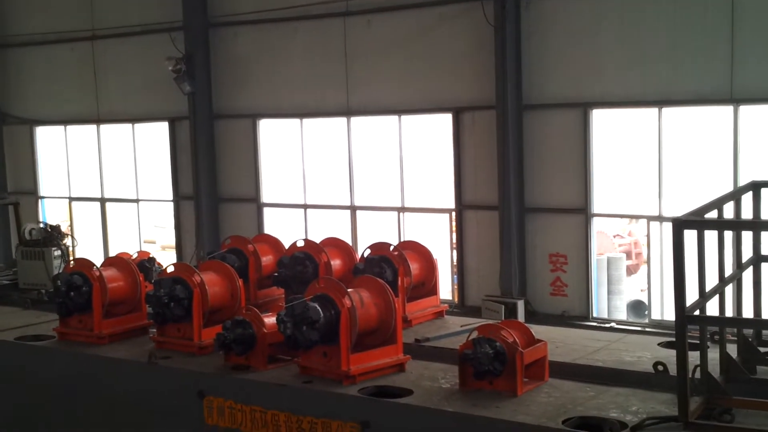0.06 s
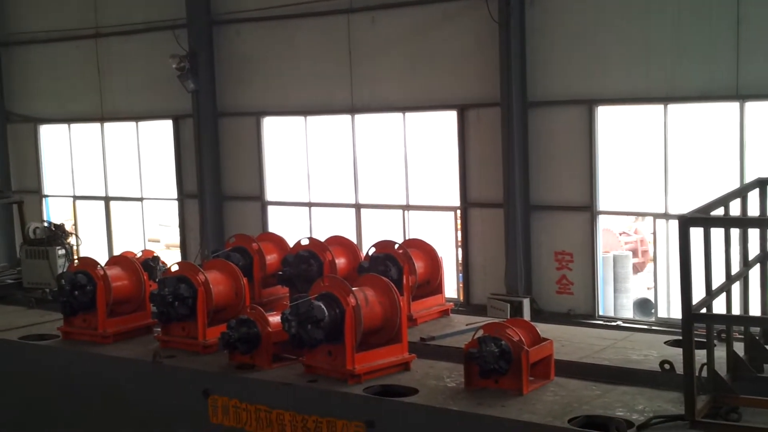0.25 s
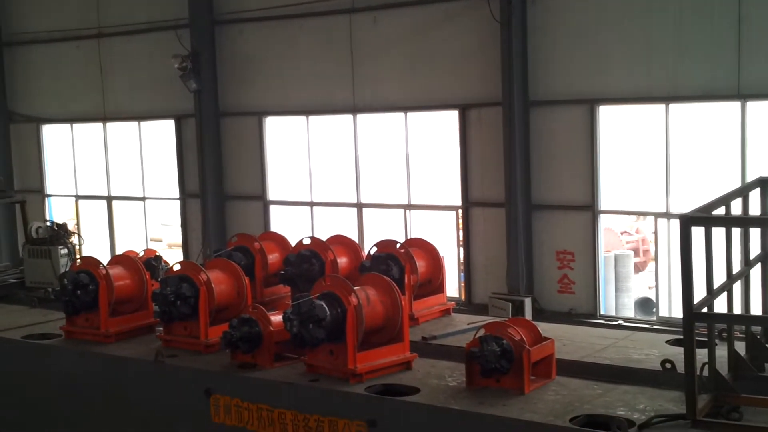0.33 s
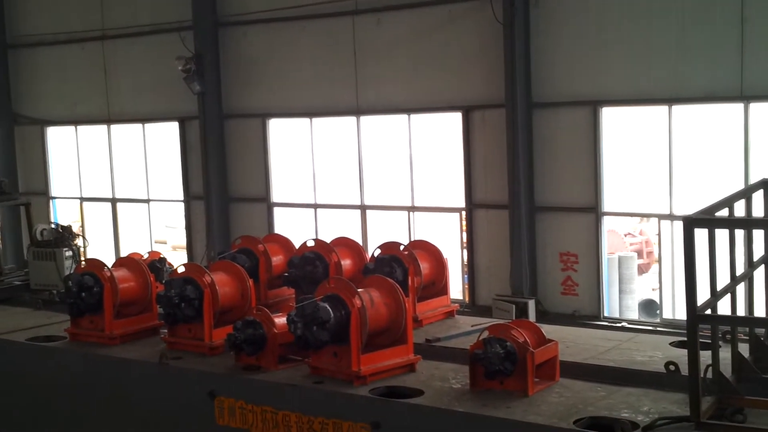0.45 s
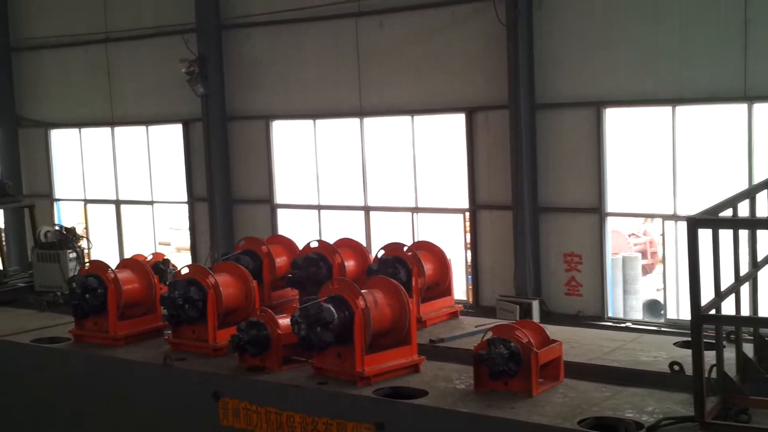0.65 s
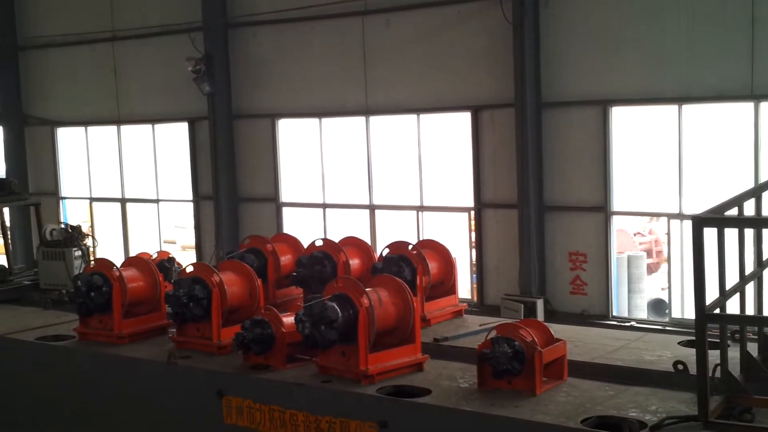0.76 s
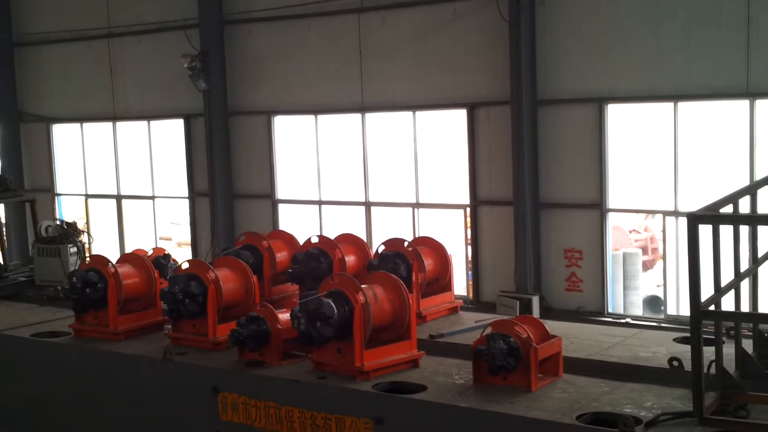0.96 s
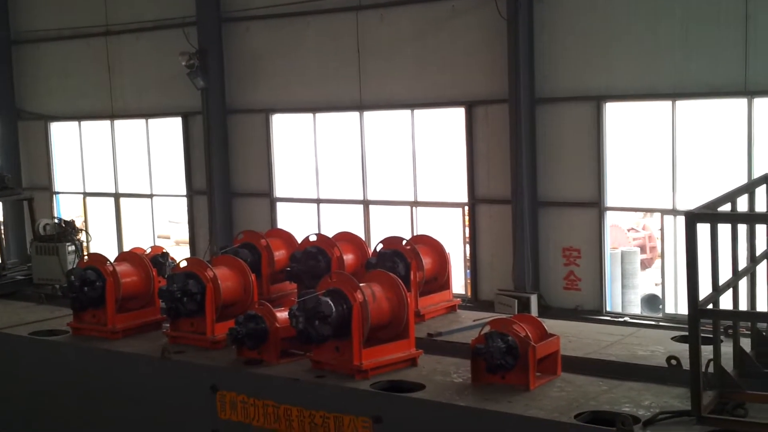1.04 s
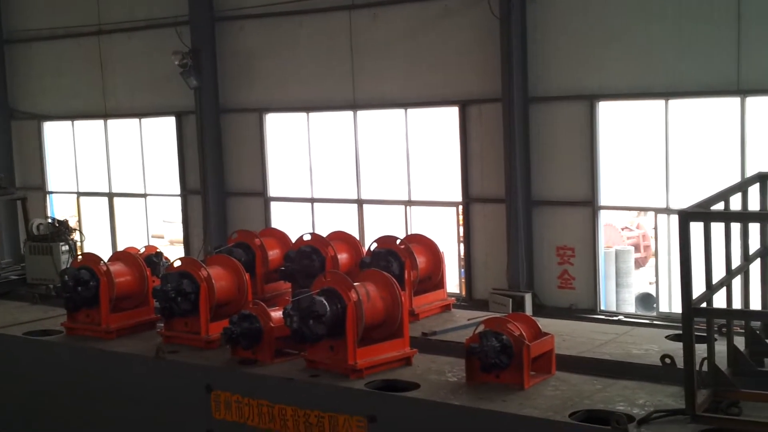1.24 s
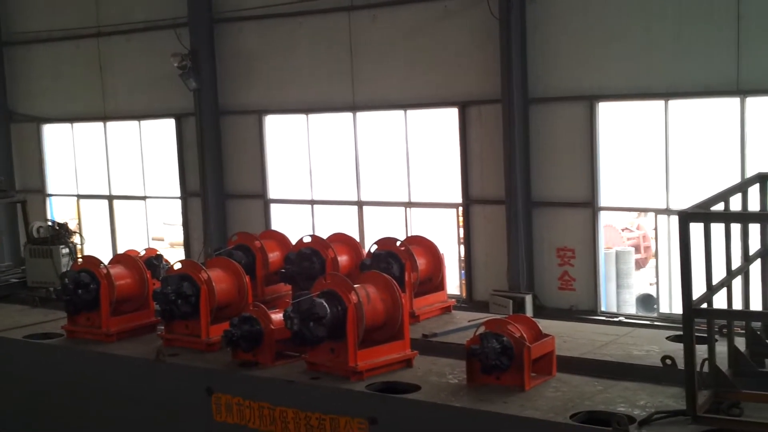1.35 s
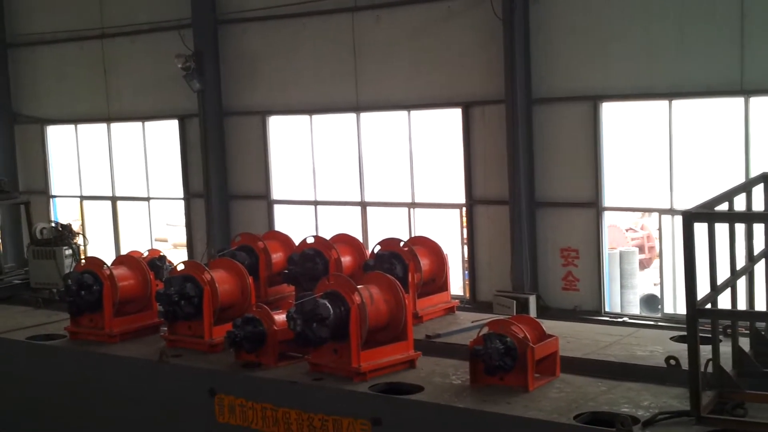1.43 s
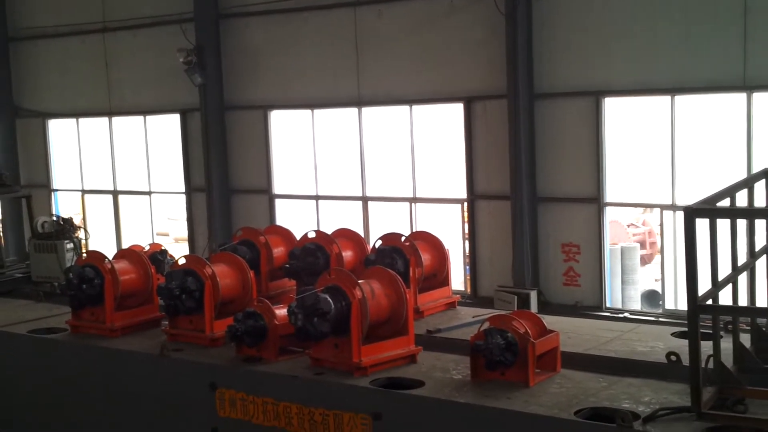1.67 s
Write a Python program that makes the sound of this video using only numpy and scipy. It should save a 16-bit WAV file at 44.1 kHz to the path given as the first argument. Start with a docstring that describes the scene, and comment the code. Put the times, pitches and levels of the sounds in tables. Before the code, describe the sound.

A loud metallic clang breaks into the steady hum and hiss of a big workshop. The steel hits several times in quick succession, distorting the single microphone for a moment, then rings on with a long echo.

```python
"""A machine hum and a steady hiss fill a large workshop hall; then a heavy steel piece crashes down.
It makes a few contacts in quick succession, and each sets its modes ringing.
From where the microphone stands, the ring hangs on in the hall, beating as the reflections cross.
The clang overloads the single microphone for half a second."""
import sys
import numpy as np
from scipy import signal
from scipy.fft import rfft, irfft
from scipy.io import wavfile
from scipy.ndimage import uniform_filter1d

SR = 44100
rng = np.random.default_rng(int(sys.argv[2]) if len(sys.argv) > 2 else 0)


def file_out(sig):
    """Save sig as 16-bit WAV at sys.argv[1]."""
    # one column per channel
    cols = np.atleast_2d(sig).T
    # limit, then scale
    lim = np.clip(cols, -1, 1)
    pcm = np.round(lim * 32767).astype(np.int16)
    wavfile.write(sys.argv[1], SR, pcm)


N = 74970

# room tone of the hall: frequency_hz, relative_density_db
ROOM_TONE_SPECTRUM = [(25, -18), (60, -10.5), (125, -4), (220, -2), (430, -1.5), (900, -5.5), (1400, -7.5),
                      (2300, -10), (4000, -14), (6300, -11), (8500, -23.5), (11500, -47.5), (15000, -67)]
# contacts of the steel: start_s, crash_level_db, ring_level_db
CONTACTS = [(0.215, -16, -42), (0.223, -8.5, -18.5), (0.236, -0.5, -7.5), (0.253, -3.5, -3.5),
            (0.266, -3, -2), (.31, -5, -4), (.49, -9, -10)]
# dense weak modes between the strong ones: frequency_hz, relative_density_db
CRASH_SPECTRUM = [(30, -27), (100, -35), (300, -16), (700, -11.5), (1400, 1.5), (2500, -2), (3300, 2),
                  (4300, 0.5), (6500, -11.5), (8300, -13), (10000, -54), (15000, -44)]
# swell and fall of the low tone: time_s, level_db
LOW_TONE_ENVELOPE = [(.42, -31), (.5, -22.5), (.58, -14.5), (.78, -20.5), (.87, -32), (.94, -22.5),
                     (1.04, -29.5), (1.1, -38)]
# strong modes of the steel, lower range: pitch_hz
LOWER_MODE_HZ = [470, 835, 1082, 1123, 1359, 1472, 1496, 1800, 1862, 2100, 2147, 2365, 2427, 2611, 2763,
                 2865, 3320, 3482]
# strong modes of the steel, upper range: pitch_hz
HIGH_MODE_HZ = [3650, 3806, 4078, 4120, 4266, 4403, 4540, 4943, 5190, 5653, 6270, 6428, 6853, 7430, 7945,
                8160, 8305]
# how each of these rings in the hall, low to high: level_db, line_width_hz, build_up_s, t60_s
MODE_RINGS = [(-23.5, 21, 0.014, 3.35), (-25, 11.2, 0.0033, 2.64), (-18, 2.8, 0.02, 2.85),
              (-13, 16, 0.035, 2.72), (-21, 11, 0.12, 3.6), (-13, 24.5, 0.036, 3.56),
              (-9.5, 10.7, 0.22, 3.57), (-25, 50, 0.05, 7.7), (-15, 9.2, 0.28, 3.5),
              (-11, 13.2, 0.043, 3.2), (-19.5, 11.6, .03, 2.8), (-19, 13, 0.036, 3.1),
              (-11.5, 12, 0.15, 3.53), (-10.5, 6.5, 0.039, 3.23), (-12, 12.5, 0.043, 2.4),
              (-24.5, 22, 0.023, 4.1), (-13.5, 7.1, 0.15, 3.2), (-22.5, 17, 0.025, 1.5),
              (-17, 11, 0.01, 2.6), (-25, 5.5, .03, 1.7), (-11.5, 32, 0.085, 3.1), (-16.5, 38, 0.01, 3.1),
              (-20.5, 4.7, 0.027, 2.8), (-15, 29, .015, 2.7), (-21, 24, 0.018, 1.1),
              (-15, 23.5, 0.037, 2.26), (-16, 42, 0.0083, 1.3), (-15.5, 15, 0.12, 2.29),
              (-14.5, 41, 0.035, 2.25), (-15, 34, 0.042, 1.8), (-22, 16, 0.085, 2.1), (-28, 81, 0.033, 1.7),
              (-21, 10, 0.034, 1.6), (-21, 72, 0.024, 1.7), (-18, 40, 0.033, 1.48)]
# late beats in which the ring swells: centre_s, half_length_s, gain_db
LATE_SWELLS = [(1.233, 0.0073, 5), (1.425, 0.037, 3.5)]
# response of the microphone chain after the overload: frequency_hz, gain_db
MIC_RESPONSE = [(30, 0), (8000, -1), (12000, -1), (15500, -0.5)]

EARLY_DB, EARLY_T60_S = 3.5, 1.7  # first reflections: level over the hall's tail, extra decay
BEAT_SPAN_S = 0.28  # a tone's slower level changes are evened out


def undb(db):
    """Decibels to amplitude."""
    return 10 ** (np.asarray(db) / 20)


def unit_rms(x):
    """Scale to rms 1."""
    return x / np.sqrt(np.mean(np.abs(x) ** 2))


def equalise(x, points):
    """Filter by a curve of (frequency_hz, gain_db) points."""
    hz, db = np.array(points, float).T
    bin_hz = np.maximum(np.arange(N // 2 + 1) * SR / N, 1)
    return irfft(rfft(x) * undb(np.interp(np.log(bin_hz), np.log(hz), db)), N)


def hall_tone(hz, width_hz=0, steady_share=1):
    """A tone of rms 1; all but its steady share wanders as reflections add and cancel at the microphone."""
    carrier = np.exp(2j * np.pi * hz * np.arange(N) / SR)
    pole = np.exp(-np.pi * width_hz / SR)
    noise = rng.standard_normal(2 * N) + 1j * rng.standard_normal(2 * N)
    sway = signal.lfilter([1], [1, -pole], noise)
    sway = signal.lfilter([1], [1, -pole ** 6], sway)[N:]
    sway /= np.sqrt(uniform_filter1d(np.abs(sway) ** 2, int(BEAT_SPAN_S * SR)))
    amplitude = np.sqrt(steady_share) + np.sqrt(1 - steady_share) * sway
    return unit_rms(np.real(amplitude * carrier))


def hall_envelope(contacts, build_s, t60_s):
    """The energy of each contact (start_s, level_db) builds up in the hall, then dies away."""
    energy = np.zeros(N)
    for start_s, db in contacts:
        age = np.maximum(np.arange(N) / SR - start_s, 0)
        rise = 1 - np.exp(-age / build_s)
        fade = 1e-6 ** (age / t60_s)
        early = undb(EARLY_DB) ** 2 * 1e-6 ** (age / EARLY_T60_S)
        energy += undb(db) ** 2 * rise * fade * (1 + early)
    return np.sqrt(energy)


def room_tone():
    """Steady rumble and hiss of the hall, with the hum of a machine."""
    hiss = unit_rms(equalise(rng.standard_normal(N), ROOM_TONE_SPECTRUM))
    hum = hall_tone(hz=180)
    return undb(-27) * hiss + undb(-36) * hum


def low_tone():
    """A pure low ring that blooms after the first contacts and drops away."""
    times, db = np.array(LOW_TONE_ENVELOPE).T
    level_db = np.interp(np.arange(N) / SR, times, db, left=-np.inf, right=-np.inf)
    return undb(level_db) * hall_tone(hz=835.5)


def ping():
    """One high mode that the hardest contact sets ringing, soon damped."""
    envelope = hall_envelope([(0.269, -1.5)], build_s=0.0073, t60_s=0.31)
    return envelope * hall_tone(hz=4169, width_hz=8.3, steady_share=0.6)


def crash():
    """The steel's dense weak modes wash through the hall; the higher octaves die sooner."""
    contacts = [(start_s, db) for start_s, db, _ in CONTACTS]
    spectrum = rfft(unit_rms(equalise(rng.standard_normal(N), CRASH_SPECTRUM)))
    bin_hz = np.maximum(np.arange(len(spectrum)) * SR / N, 1)
    bin_octave = np.clip(np.log2(bin_hz / 2000), -4, 3)  # octaves from 2 kHz
    wash = np.zeros(N)
    for octave in range(-4, 4):
        band = irfft(spectrum * np.maximum(1 - np.abs(bin_octave - octave), 0), N)
        wash += band * hall_envelope(contacts, build_s=0.006, t60_s=3.52 * 2 ** (-0.085 * octave))
    return undb(-11.5) * wash


def clang():
    """The strong modes of the steel, each drawn out by the hall; the tail swells twice."""
    t = np.arange(N) / SR
    contacts = [(start_s, db) for start_s, _, db in CONTACTS]
    modes = np.zeros(N)
    for hz, (db, width_hz, build_s, t60_s) in zip(LOWER_MODE_HZ + HIGH_MODE_HZ, MODE_RINGS):
        steady_share = 0.18 / (1 + (width_hz / 12) ** 2)  # lines wider than 12 Hz keep little of it
        envelope = hall_envelope(contacts, build_s, t60_s)
        modes += undb(db) * envelope * hall_tone(hz, width_hz, steady_share)
    swell_db = sum(db * np.exp(-((t - centre_s) / half_s) ** 2) for centre_s, half_s, db in LATE_SWELLS)
    return modes * undb(swell_db)


def scene():
    """One microphone in the hall feeds both channels."""
    return np.tile(clang() + ping() + low_tone() + crash() + room_tone(), (2, 1))


def record(dry):
    """The microphone overloads and flattens the peaks, a little lopsidedly; the top is cut at 15.7 kHz."""
    clip_level, knee, bias = 0.715, 11, 0.02
    drive = dry / clip_level + bias
    flattened = drive / (1 + np.abs(drive) ** knee) ** (1 / knee)
    clipped = clip_level * (flattened - bias)
    top_cut = signal.firwin(401, 15700, fs=SR, window=("kaiser", 8))
    return np.array([signal.fftconvolve(equalise(ch, MIC_RESPONSE), top_cut, "same") for ch in clipped])


dry = scene()
out = record(dry)
file_out(out)
```